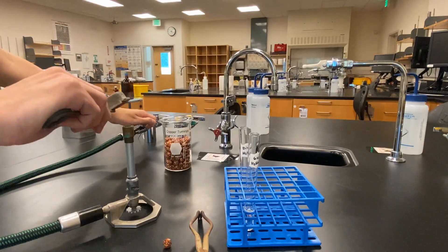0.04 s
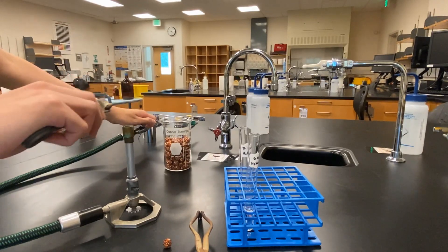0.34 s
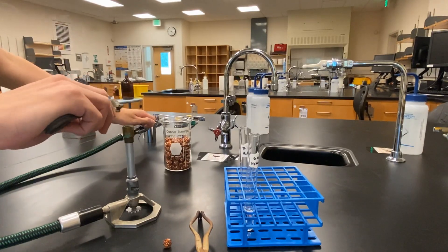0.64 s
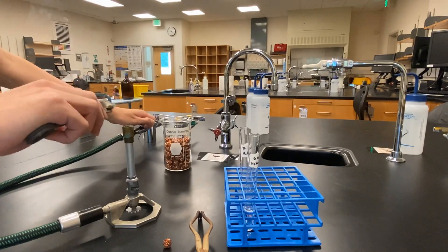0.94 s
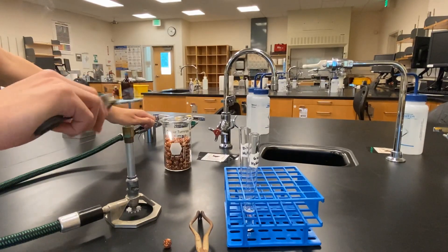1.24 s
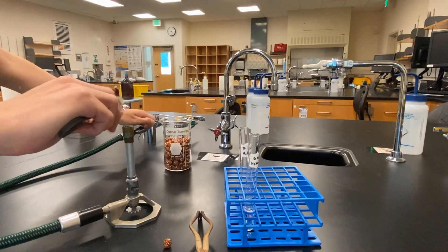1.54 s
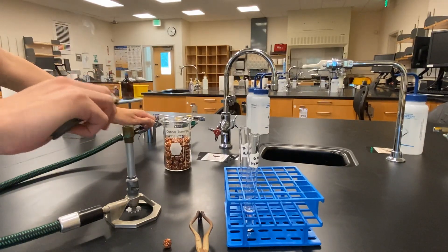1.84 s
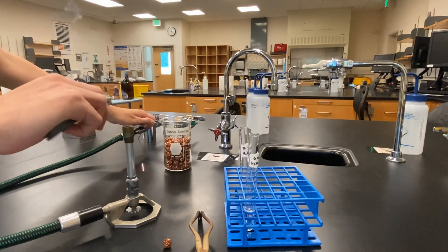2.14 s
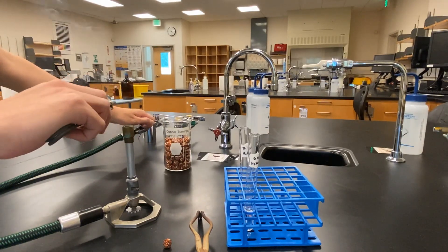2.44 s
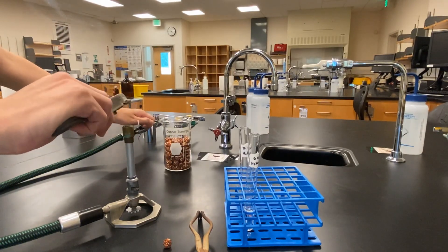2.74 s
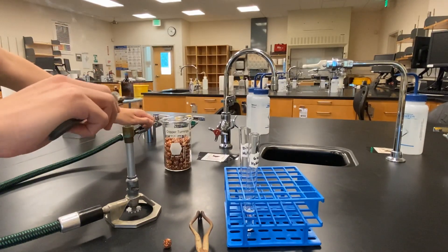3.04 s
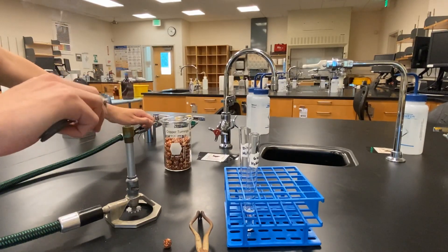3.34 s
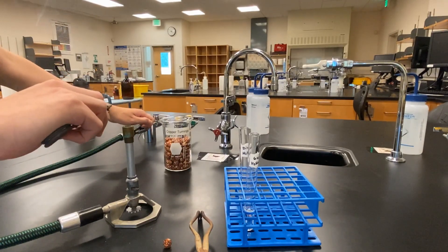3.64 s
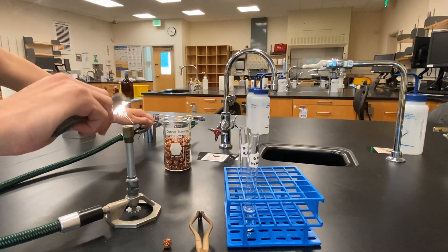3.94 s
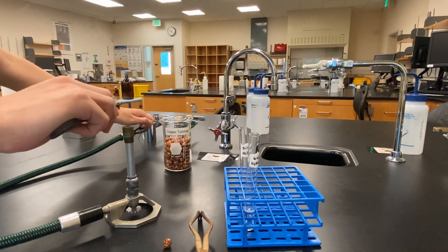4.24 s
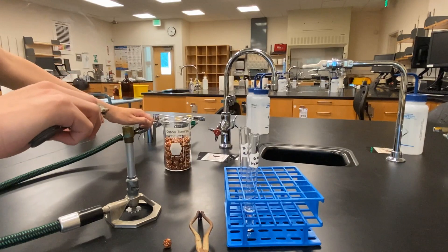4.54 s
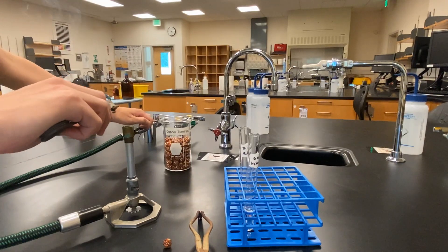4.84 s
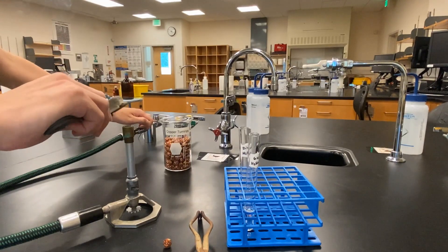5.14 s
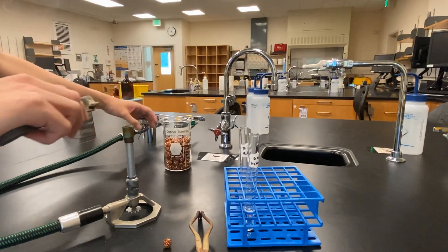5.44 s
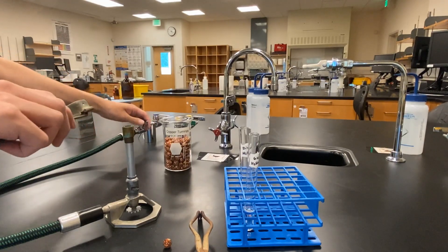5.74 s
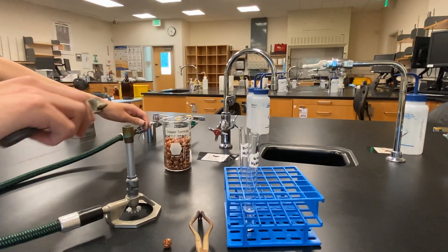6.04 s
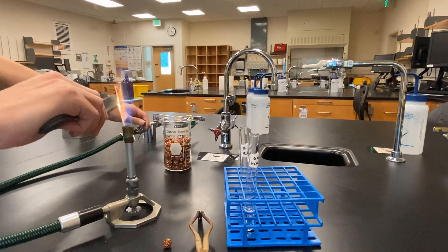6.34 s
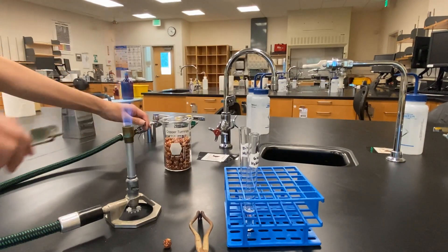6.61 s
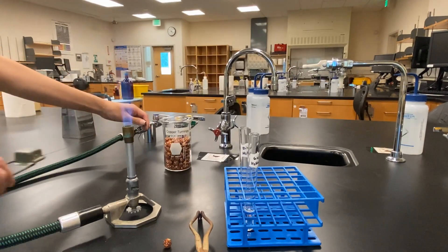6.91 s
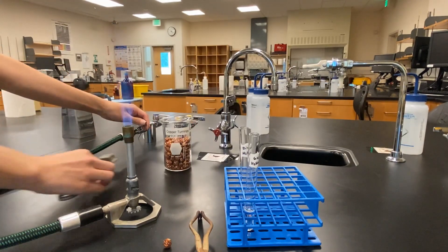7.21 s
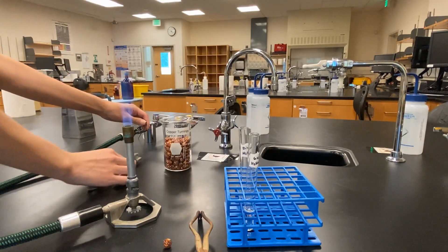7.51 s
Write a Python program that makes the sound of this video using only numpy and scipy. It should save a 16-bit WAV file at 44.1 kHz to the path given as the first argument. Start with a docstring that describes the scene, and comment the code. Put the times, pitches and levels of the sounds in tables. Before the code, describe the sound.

A steel flint striker is squeezed ten times, close to the microphone and slightly left, in a school lab with a short reverb. Each squeeze is a brief, bright rasp ending in a ringing snap, and about a fifth of a second later the spring drags back with a lighter scrape and a high squeak. Strikes come at about 0.1, 0.8, 1.2, 1.7, 2.1, 2.8 and 3.3 seconds, then slow to 4.1, 5.1 and 6.3. A stool scrapes faintly in the background at 4.7 and 5.7 seconds. A thin gas hiss rises from 6 seconds, and at 6.4 the burner catches with a low, fluttering pop, settling into a soft roar until the end, around 7.7 seconds. A sleeve brushes faintly near 1 second and again after 7. Quiet ventilation rumble and fan hum continue throughout.

```python
"""A flint striker is squeezed ten times over a gas burner in a ventilated school lab.
Each squeeze rasps the flint across a file and snaps against the stop, ringing the steel; the spring
drags it back with a squeak. The gas hisses up, catches with a fluttering pop and burns with a soft roar.
Behind it a stool scrapes twice, a sleeve brushes the bench and the ventilation rumbles and hums."""
import sys
import numpy as np
from scipy import signal
from scipy.fft import rfft, irfft, next_fast_len
from scipy.io import wavfile
from scipy.ndimage import uniform_filter1d

SR = 44100
rng = np.random.default_rng(int(sys.argv[2]) if len(sys.argv) > 2 else 0)


def file_out(sig):
    """Save sig as 16-bit WAV at sys.argv[1]."""
    # one column per channel
    cols = np.atleast_2d(sig).T
    # limit, then scale
    lim = np.clip(cols, -1, 1)
    pcm = np.round(lim * 32767).astype(np.int16)
    wavfile.write(sys.argv[1], SR, pcm)


N = 338247

# Squeezes of the striker. Each row: start, loading time, travel time and bite swell in seconds,
# then tick, creak, bite and snap in relative dB.
SQUEEZE_CUES = [(0.0731, 0.027, 0.01, 0.0033, -37, -53.5, -20.5, -13.5),
                (0.779, .024, .0375, 0.0042, -32, -45, -20, -8.5),
                (1.1732, .0315, .0085, .007, -34, -53, -18.5, -7.5),
                (1.673, .020, 0.031, 0.0026, -38.5, -66, -25, -10),
                (2.0576, .0185, 0.035, 0.0039, -27.5, -42, -19.5, -8.5),
                (2.7516, .034, 0.0085, 0.0039, -37.5, -46, -17.5, -8.5),
                (3.2296, .0295, .0268, 0.0053, -32, -51, -21, -13.5),
                (4.0413, .031, .009, 0.0038, -37, -55, -21, -11.5),
                (5.0815, 0.032, 0.025, 0.0027, -35.5, -50, -21.5, -15),
                (6.2954, 0.038, 0.016, 0.0021, -38.5, -42.5, -20, -15)]
# Spring returns. Each row: start and travel time in seconds, opening rasp, closing rasp, stall depth and
# knock in relative dB, squeak swell in seconds, squeak pitch in Hz, squeak level in relative dB.
RETURN_CUES = [(.271, 0.031, -31.5, -25, 26, -16.5, 0.003, 4090, -26),
               (.984, 0.028, -26.5, -29.5, 29, -17.5, .006, 4093, -29),
               (1.380, .020, -24.5, -28, 4.5, -17, 0.013, 3970, -26),
               (1.9, 0.027, -24, -38.5, 8.5, -18.5, 0.0086, 4200, -26),
               (2.252, 0.038, -29.5, -34.5, 15.5, -20, 0.0069, 4160, -26.5),
               (2.985, 0.02, -26, -31.5, 6.5, -18.5, 0.0056, 4110, -25.5),
               (3.4392, .0295, -36.5, -27.5, 12.5, -18.5, .012, 4090, -29.5),
               (4.281, 0.023, -26, -30.5, -0.5, -24, 0.0059, 4063, -21.5),
               (5.327, 0.026, -30, -38, -0.5, -25, 0.0058, 4122, -22.5),
               (6.525, 0.019, -23, -27, -1, -26, 0.0084, 3900, -40)]
# Ring of the spring wire and cup. Each row: pitch in Hz, time to fade by 60 dB in seconds,
# relative dB when squeezed, relative dB when slack.
STEEL_MODES = [(905, 0.021, -29, -32.5), (1885, 0.093, -22, -22.5), (2786, 0.025, -5, -8),
               (3218, 0.036, -14.5, -10.5), (3170, 0.034, -4.5, -6), (3790, 0.036, -19.5, -6),
               (4170, .3, -28, -20.5), (4280, 0.099, -17.5, -6), (5317, 0.016, -18, -11.5),
               (5530, 0.12, -22.5, -20.5), (6330, 0.02, -0.5, -10), (6270, 0.57, -20.5, -18.5),
               (7200, 0.011, -19.5, -13.5), (7660, 0.038, -14, -13.5), (7500, 0.15, -13.5, -14.5),
               (10170, 0.017, -11.5, -16.5), (12600, .008, -5, -16.5), (10860, 0.028, -15.5, -15),
               (13000, .015, -18, -11), (15400, 0.024, -19, -6)]
# The dead crack of flint on steel. Each row: frequency in Hz, relative level in dB.
CRACK_SPECTRUM = [(100, -28.5), (400, -18), (850, -27), (1400, -20.5), (2100, -7.5), (2700, 0.5), (3700, 2),
                  (5000, -1), (7500, 5.5), (9500, 2), (12000, 3.5), (13700, 0.5), (15500, 0)]
# How a slack spring colours that crack. Each row: frequency in Hz, boost or cut in dB.
SLACK_EQ = [(300, -6), (1500, -4.5), (3200, 11.5), (7500, 4.5), (9300, -0.5), (12000, 7.5), (15500, -1.5)]
# Hiss of the gas jet. Each row: frequency in Hz, relative level in dB.
JET_SPECTRUM = [(1500, -16.5), (2300, -9.5), (3300, -3), (5400, 2.5), (7000, -5.5), (10000, -6.5),
                (12500, 2), (13700, 1.5), (15500, 2)]
# The gas being turned up. Each row: time in seconds, hiss level in dB.
JET_FADER = [(5.97, -100), (6.03, -66), (6.4, -55), (7.0, -62), (7.67, -58.5)]
# Roar of the flame. Each row: frequency in Hz, relative level in dB.
FLAME_SPECTRUM = [(30, 5.5), (70, -0.5), (140, 4.5), (300, -6), (600, -8.5), (1000, -15.5), (1800, -21.5),
                  (3500, -25), (7000, -34.5), (14000, -40)]
# Pop of the gas catching. Each row: frequency in Hz, relative level in dB.
POP_SPECTRUM = [(30, -26), (70, 5.5), (130, 2.5), (280, -3), (450, -9), (850, -11.5), (1300, -25),
                (2500, -28.5), (6000, -40)]
# The flame flares as it catches and once more later. Each row: start and rise in seconds, relative dB.
FLARE_CUES = [(6.382, 0.016, -27), (6.409, 0.014, -29.5), (6.432, 0.023, -30), (6.484, 0.013, -35),
              (6.525, 0.013, -37.5), (7.050, 0.025, -42.5)]
# Shoves of the stool. Each row: start and length in seconds, then legs, scuff and floor drone in dB.
SHOVE_CUES = [(4.67, 0.064, -51, -68, -46), (4.793, 0.087, -51, -50.5, -42), (5.692, 0.097, -49, -49, -40)]
# The stool's steel legs. Each row: pitch in Hz, bandwidth in Hz, relative level in dB.
LEG_MODES = [(643, 35, 3.5), (1757, 51, 2), (2324, 33, -7), (3212, 44, -5), (3860, 90, -26),
             (4700, 79, -21.5)]
# Scuff of its feet. Each row: frequency in Hz, relative level in dB.
SCUFF_SPECTRUM = [(150, -3.5), (600, 5.5), (1400, 1), (2000, -7), (2800, -4.5), (3700, -11), (4400, -22),
                  (9000, -42)]
# Brushes of sleeve and hand. Each row: start in seconds, rise in seconds, level in dB.
BRUSH_CUES = [(.760, 0.0074, -49.5), (1.095, 0.039, -54), (7.058, 0.0053, -49), (7.288, 0.02, -53.5),
              (7.413, 0.0065, -50)]
# Rustle of the sleeve. Each row: frequency in Hz, relative level in dB.
CLOTH_SPECTRUM = [(150, -34), (600, 10), (1000, 4), (1500, 4), (3000, -7), (6000, -8), (12000, -41)]
# Rumble of the air ducts. Each row: frequency in Hz, relative level in dB.
DUCT_SPECTRUM = [(30, -4.5), (55, 0.5), (80, -7), (120, -1.5), (215, -5), (300, -15), (550, -22.5),
                 (800, -25.5), (1300, -25.5), (2000, -32), (4100, -39), (8000, -47.5), (12000, -55),
                 (16000, -78.5)]
# Hum of the fan. Each row: pitch in Hz, level in dB.
FAN_TONES = [(46, -57), (170, -59.5), (220, -62), (339, -66), (392, -70.5), (888, -81)]
# The lab's reverb tail. Each row: frequency in Hz, time to fade by 60 dB in seconds.
LAB_DECAY = [(200, 0.32), (1000, 0.35), (3500, 0.46), (7000, 0.47), (11500, 0.45), (13500, 0.46),
             (16000, 0.5)]
# Colour of the lab's reflections. Each row: frequency in Hz, boost or cut in dB.
REFLECTION_EQ = [(200, 3.5), (700, 17), (1300, 10), (2200, 6), (3000, 3.5), (5000, 1), (7300, 1.5),
                 (9500, 1.5), (16000, -7)]
# Stereo image of diffuse sound. Each row: frequency in Hz, left-right correlation from 0 to 1.
STEREO_LIKENESS = [(30, 0.83), (120, 1), (250, 0.47), (500, 0.029), (1000, 0.0082), (16000, 0)]
# The striker's balance between the microphones. Each row: frequency in Hz, left minus right in dB.
LEFT_BALANCE = [(500, 5.5), (2500, -0.5), (5000, 4), (8000, 2), (16000, -3)]
# The striker reaches the microphones out of step. Each row: frequency in Hz, left's lead in radians.
LEFT_PHASE_LEAD = [(20, -0.5), (600, 2), (1500, 3), (2800, 3.5), (4400, 5.5), (6200, 8), (7100, 7),
                   (8000, 11), (9300, 2.5), (10400, 1.85), (12000, 0.5), (13200, -9.5), (15000, -5)]


def squeezes(creak_hz=6050, skid_db=-15, run_up_db=-12.5, run_up_s=.003):
    """The wire ticks and creaks under load; the flint bites, skids over the file and snaps at the stop."""
    t = np.arange(SR // 10) / SR
    drive, song = np.zeros((2, N))
    for start, loading, travel, swell, tick_db, creak_db, bite_db, snap_db in SQUEEZE_CUES:
        add(drive, start, gain_of(tick_db) * knock(spark_db=-20))
        add(song, start, gain_of(creak_db) * squeak(creak_hz, swell_s=.013, wobble=.012))
        bite = gain_of(bite_db) * np.maximum(hump(t / swell), gain_of(skid_db))
        # the flint digs in again just before the stop
        run_up = gain_of(snap_db + run_up_db) * np.exp(-abs(t - travel) / run_up_s)
        pressure = np.hypot(bite, run_up) * held(t, rise_s=.0005, length_s=travel, fade_s=.0013)
        add(drive, start + loading, rasp(pressure, teeth_per_s=2600, grit=.4))
        add(drive, start + loading + travel, gain_of(snap_db) * knock(spark_db=-26.5))
    return steel_body(drive, slack=False, ring_db=-4.5) + singing_wire(song)


def returns(chirp_hz=2986, chirp_lead_s=.0099):
    """The spring drags the flint back: a squeak, a light rasp that may stall, a lower chirp, a knock."""
    t = np.arange(SR // 10) / SR
    drive, song = np.zeros((2, N))
    for start, travel, start_db, end_db, stall_db, knock_db, swell, hz, squeak_db in RETURN_CUES:
        progress = np.minimum(t / travel, 1)
        stall = np.exp(-((progress - .4) / .2) ** 2)
        pressure_db = start_db + (end_db - start_db) * progress - stall_db * stall
        pressure = gain_of(pressure_db) * held(t, rise_s=.0035, length_s=travel, fade_s=.004)
        add(drive, start, gain_of(4.5) * rasp(pressure, teeth_per_s=2700, grit=.25))
        add(drive, start + travel, gain_of(knock_db) * knock(spark_db=-37.5))
        add(song, start, gain_of(squeak_db) * squeak(hz, swell, wobble=.032))
        chirp = squeak(chirp_hz, swell_s=.005, wobble=.057, feed_per_s=3, ring_t60=.2)
        chirp_db = end_db - 9 + .69 * stall_db  # a stalled flint breaks free harder
        add(song, start + travel - chirp_lead_s, gain_of(chirp_db) * chirp)
    return steel_body(drive, slack=True, ring_db=-7) + singing_wire(song)


def rasp(pressure, teeth_per_s, grit):
    """The flint trips unevenly over the file teeth and crumbles between them."""
    jitter, size, dust = rng.standard_normal((3, SR // 10))[:, :len(pressure)]
    teeth_passed = np.floor(np.cumsum(1 + jitter) * teeth_per_s / SR)
    clicks = np.diff(teeth_passed, prepend=0) * np.tanh(2 * size)
    return pressure * unit_rms(clicks + grit * dust)


def knock(spark_db, crush_s=.00078, spark_s=.034, boost_db=2):
    """A knock crushes the flint for a millisecond and throws sparks that sizzle briefly."""
    t = np.arange(SR // 12) / SR
    blow = rng.choice([-1, 1], len(t)) * hump(t / crush_s)
    sparks = unit_rms(rng.standard_normal(len(t)) * (rng.random(len(t)) < .04))
    return gain_of(boost_db) * (blow + gain_of(spark_db) * sparks * np.exp(-t / spark_s))


def crack(slack, size=1024):
    """Flint hits steel: a sharp-fronted click of unit energy, recoloured when the spring is slack."""
    hz = abs(np.fft.fftfreq(size, 1 / SR))
    log_gain = np.log(gain_of(curve_at(CRACK_SPECTRUM, hz) + slack * curve_at(SLACK_EQ, hz)))
    minimum_phase = np.exp(np.conj(signal.hilbert(log_gain)))
    click = np.fft.ifft(minimum_phase).real
    return click / np.linalg.norm(click)


def steel_body(drive, slack, ring_db, detune=.007, room_ring_db=-8):
    """Blows crack and ring the steel, which each grip detunes. Gives left, right and room send."""
    t = np.arange(SR // 4) / SR
    click, out = crack(slack), np.zeros((3, N))
    for part in grips(drive):
        body = np.zeros((3, len(t)))
        for hz, t60, squeezed_db, slack_db in STEEL_MODES:
            shift, *phases = rng.standard_normal(4)  # each mode radiates in a pattern of its own
            tone = np.cos(2 * np.pi * hz * (1 + detune * shift) * t + np.c_[phases])
            mode = gain_of(-60 * t / t60) * tone
            mode_db = ring_db + (slack_db if slack else squeezed_db)
            body += gain_of(mode_db) * mode / np.linalg.norm(mode[0])
        body[2] *= gain_of(room_ring_db)  # summed over all directions, peaks and notches even out
        body[:, :len(click)] += click
        out += convolve(part, body / np.linalg.norm(body, axis=1, keepdims=True))
    return out


def squeak(hz, swell_s, wobble, feed_per_s=7.4, ring_t60=.5):
    """Stick and slip lock onto a mode of the wire; the longer they last, the more ring they leave."""
    t = np.arange(SR // 3) / SR
    burst = hump((t / swell_s) ** 2)
    ring = feed_per_s * np.minimum(t, swell_s) * gain_of(-60 * t / ring_t60)
    slip = unit_rms(uniform_filter1d(rng.standard_normal(len(t)), size=40))
    cycles = np.cumsum(hz * (1 + wobble * slip * burst)) / SR
    return (burst + ring) * np.sqrt(2) * np.sin(2 * np.pi * cycles)


def singing_wire(song):
    """The wire's squeaks go equally left and right, and at half strength to the room send."""
    return np.array([song, song, song / 2])


def grips(x, count=4, changes_per_s=3):
    """The hand keeps moving: crossfades a sound through a cycle of grips, one part for each."""
    place = np.arange(N) / SR * changes_per_s
    return [x * np.clip(1 - abs((place - k + 1) % count - 1), 0, 1) for k in range(count)]


def burner(lit_s=6.39, rise_s=.03, roar_db=-45, flutter_db=3):
    """The jet hisses; the gas catches in a few quick flares and settles to a turbulent roar."""
    t = np.arange(N) / SR
    lit = np.clip((t - lit_s) / rise_s, 0, 1)
    roar = diffuse_noise(FLAME_SPECTRUM) * lit * gain_of(roar_db + flutter_db * np.tanh(waver(60)))
    pops = diffuse_noise(POP_SPECTRUM) * swells(FLARE_CUES)
    fire = (pops + roar) * gain_of([[.7], [-.7]])  # a touch to the left
    jet_db = np.interp(t, *np.transpose(JET_FADER))
    hiss = diffuse_noise(JET_SPECTRUM) * gain_of(jet_db + .6 * waver(22))
    return fire + hiss


def stool(floor_hz=47.2):
    """A stool is shoved: its steel legs sing first, its feet scuff, and the heavy floor drones on."""
    t = np.arange(N) / SR
    sing, scuff, rumble = np.zeros((3, N))
    for start, length, sing_db, scuff_db, rumble_db in SHOVE_CUES:
        age = t - start
        sing += gain_of(sing_db) * held(age, rise_s=.017, length_s=length, fade_s=.055)
        scuff += gain_of(scuff_db) * held(age, rise_s=.037, length_s=length, fade_s=.055)
        rumble += gain_of(rumble_db) * held(age, rise_s=.099, length_s=length + .055, fade_s=.16)
    legs = np.array([sum(gain_of(db) * leg_tone(hz, width) for hz, width, db in LEG_MODES)
                     for ear in range(2)])
    drone = np.sqrt(2) * np.sin(2 * np.pi * floor_hz * t + .49 * waver(12))
    return sing * unit_rms(legs) + scuff * diffuse_noise(SCUFF_SPECTRUM) + rumble * drone


def leg_tone(hz, width_hz):
    """Friction keeps a leg resonance going: a fuzzy tone of rms 1."""
    pole = np.exp(-np.pi * width_hz / SR)
    friction = rng.standard_normal(N) + 1j * rng.standard_normal(N)
    envelope = signal.lfilter([1], [1, -2 * pole, pole * pole], friction)
    carrier = np.exp(2j * np.pi * hz * np.arange(N) / SR)
    return unit_rms((envelope * carrier).real)


def sleeve():
    """Sleeve and hand brush the striker and the bench in soft puffs of noise."""
    return diffuse_noise(CLOTH_SPECTRUM) * swells(BRUSH_CUES)


def ventilation(duct_db=-47, sway_db=1.5):
    """The bed: gently swaying duct rumble with a wavering fan hum."""
    t = np.arange(N) / SR
    hum = sum(gain_of(db) * np.sqrt(2) * np.sin(2 * np.pi * hz * t + 1.3 * waver(9))
              for hz, db in FAN_TONES)
    return diffuse_noise(DUCT_SPECTRUM) * gain_of(duct_db + sway_db * waver(6)) + hum


def lab(source, bench_db=-7, bench_s=.018, tail_db=-16, predelay_s=.0051):
    """Adds quick scatter off bench and glassware, then the room's tail; both change as the hand moves."""
    t = np.arange(SR * 3 // 5) / SR
    out, send = source[:2].copy(), source[2]
    colour = gain_of(curve_at(REFLECTION_EQ, np.fft.rfftfreq(SR, 1 / SR)))
    for part in grips(send):
        near, far = rng.standard_normal((2, 2, len(t)))
        echoes = np.sign(near) * (rng.random(near.shape) < .1)
        scatter = echoes * (t > .001) * np.exp(-t / bench_s)
        hz, age, bands = signal.stft(far * (t > predelay_s), SR, nperseg=256)
        decay = gain_of(-60 * age / curve_at(LAB_DECAY, hz)[:, None])
        tail = signal.istft(bands * decay, SR, nperseg=256)[1][:, :len(t)]
        reflections = gain_of(bench_db) * unit_rms(scatter) + gain_of(tail_db) * unit_rms(tail)
        response = irfft(rfft(reflections, SR) * colour)[:, :len(t)] / np.sqrt(len(t))
        out += convolve(part, response)
    return out


def from_left(x):
    """Places a sound to the left: the housing shades the right microphone and delays what reaches it."""
    size = next_fast_len(N)
    hz = np.fft.rfftfreq(size, 1 / SR)
    lean = gain_of(curve_at(LEFT_BALANCE, hz) / 2)
    lag = np.exp(-1j * curve_at(LEFT_PHASE_LEAD, hz))
    return irfft(rfft(x, size) * np.array([lean, lag / lean]), size)[:, :N]


def diffuse_noise(spectrum):
    """Coloured stereo noise of rms 1: centred in the bass, wide in the treble."""
    size = next_fast_len(N)
    hz = np.fft.rfftfreq(size, 1 / SR)
    left, unrelated = rfft(rng.standard_normal((2, size)))
    likeness = curve_at(STEREO_LIKENESS, hz)
    right = likeness * left + np.sqrt(1 - likeness ** 2) * unrelated
    coloured = np.array([left, right]) * gain_of(curve_at(spectrum, hz))
    return unit_rms(irfft(coloured, size)[:, :N])


def swells(cues):
    """Envelope of soft bursts that add in power."""
    t, power = np.arange(N) / SR, np.zeros(N)
    for start, rise, db in cues:
        power += gain_of(db) ** 2 * hump(np.maximum(t - start, 0) / rise) ** 3
    return np.sqrt(power)


def held(t, rise_s, length_s, fade_s):
    """Attack, hold and release, starting at t = 0."""
    return np.clip(t / rise_s, 0, 1) * np.exp(-np.maximum(t - length_s, 0) / fade_s)


def hump(u):
    """Rises to 1 at u = 1, then dies away."""
    return u * np.exp(1 - u)


def waver(per_s):
    """Random drift of rms 1, gliding to per_s new values a second."""
    place = np.arange(N) / SR * per_s
    return unit_rms(np.interp(place, np.arange(N), rng.standard_normal(N)))


def curve_at(points, hz):
    """Reads a curve on a log-frequency axis."""
    point_hz, value = np.transpose(points)
    return np.interp(np.log(hz + 1), np.log(point_hz + 1), value)


def gain_of(db):
    """Decibels to gain."""
    return 10 ** (np.asarray(db) / 20)


def unit_rms(x):
    """Scales to rms 1."""
    return x / np.sqrt(np.mean(x ** 2) + 1e-20)


def add(mix, start_s, sound):
    """Drops a sound into the mix."""
    part = mix[round(start_s * SR):][:len(sound)]
    part += sound[:len(part)]


def convolve(x, responses):
    """Plays a mono sound through one response per channel."""
    return signal.oaconvolve(x[None], responses, axes=1)[:, :N]


def scene():
    """Striker, hands and burner close by, the room behind."""
    hands = sleeve()
    striker = from_left(lab(squeezes() + returns()))
    return striker + hands + ventilation() + stool() + burner()


def record(dry, low_cut_hz=37, high_cut_hz=16000):
    """The microphone sheds the deepest rumble and rounds the sharpest peaks; a high cut trims the top."""
    low_cut = signal.butter(5, low_cut_hz, "high", fs=SR, output="sos")
    high_cut = signal.firwin(255, high_cut_hz, window=("kaiser", 8), fs=SR)
    rounded = np.tanh(signal.sosfilt(low_cut, dry))
    return signal.oaconvolve(rounded, high_cut[None], "same")


dry = scene()
out = record(dry)
file_out(out)
```